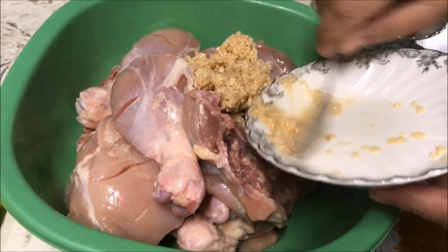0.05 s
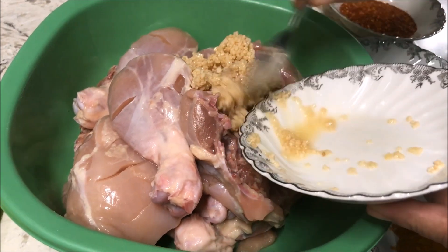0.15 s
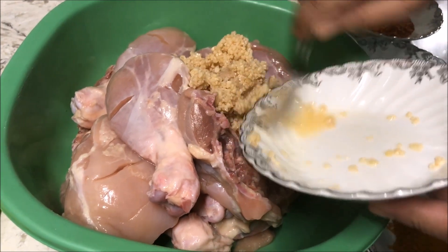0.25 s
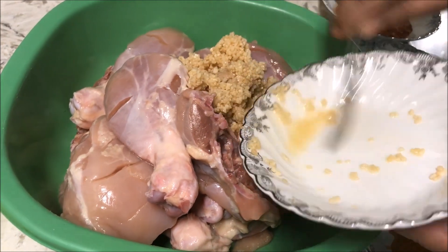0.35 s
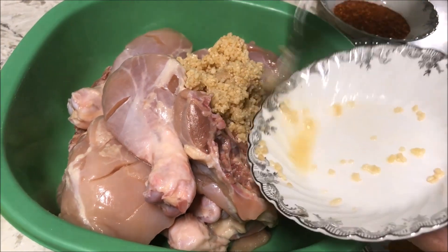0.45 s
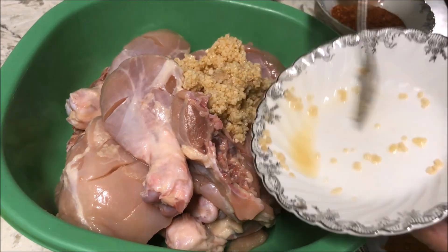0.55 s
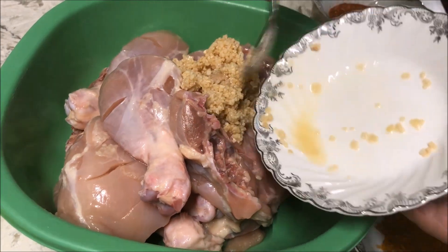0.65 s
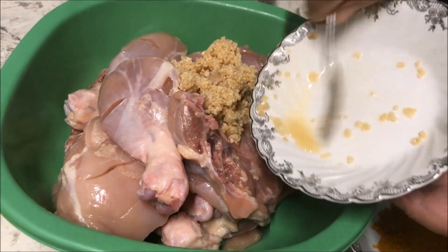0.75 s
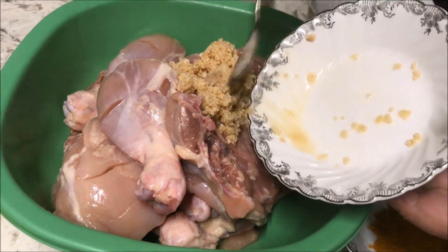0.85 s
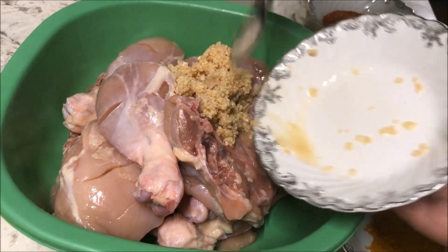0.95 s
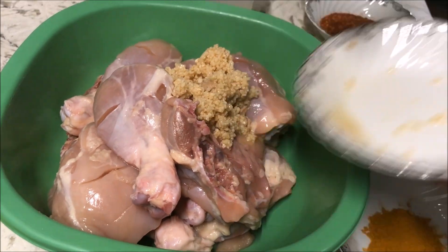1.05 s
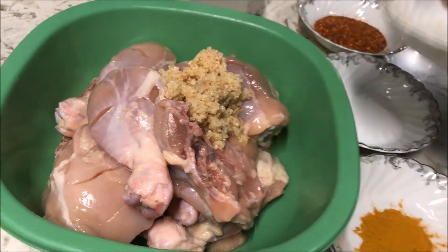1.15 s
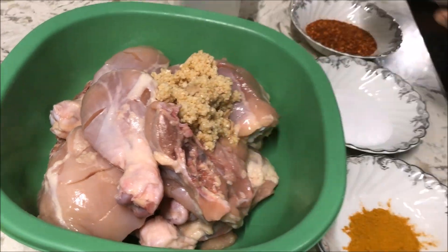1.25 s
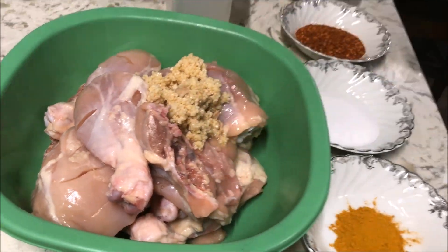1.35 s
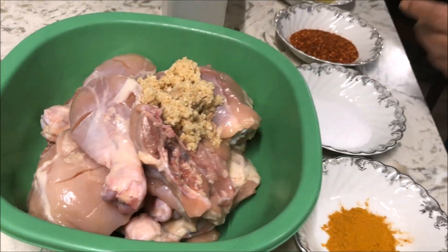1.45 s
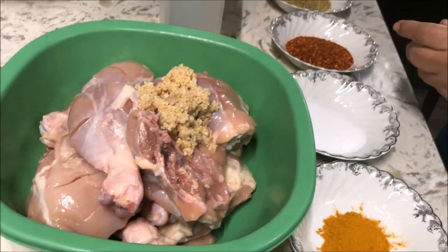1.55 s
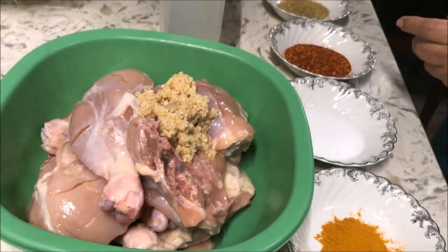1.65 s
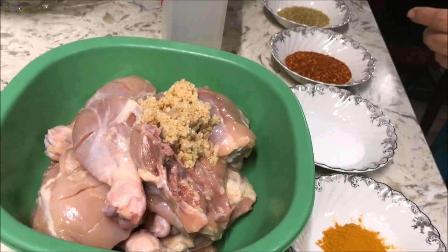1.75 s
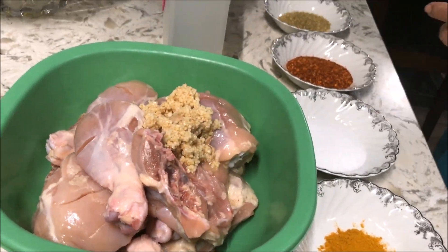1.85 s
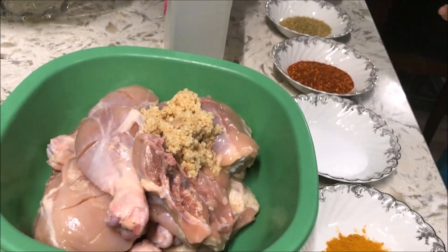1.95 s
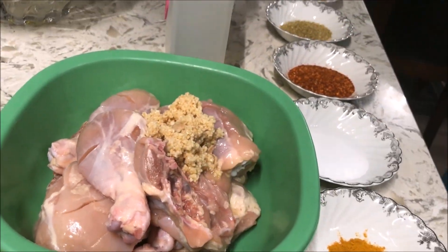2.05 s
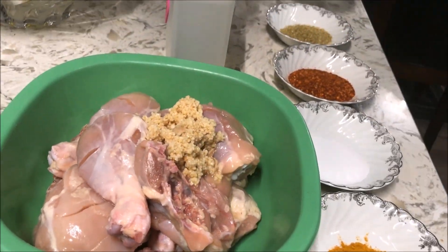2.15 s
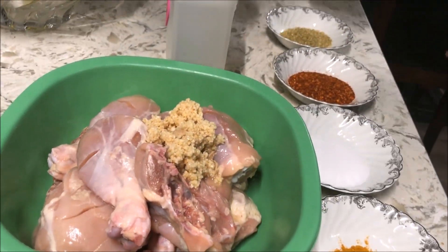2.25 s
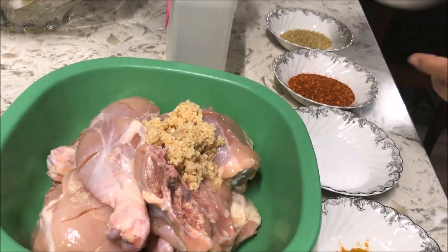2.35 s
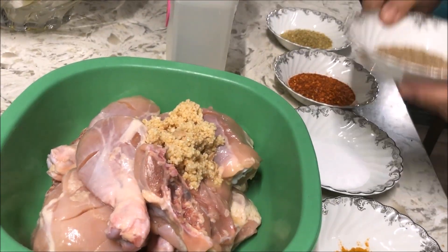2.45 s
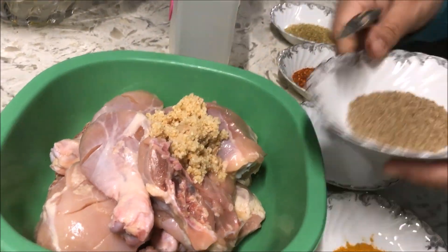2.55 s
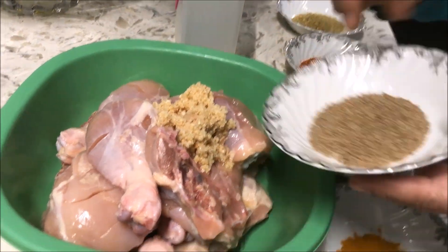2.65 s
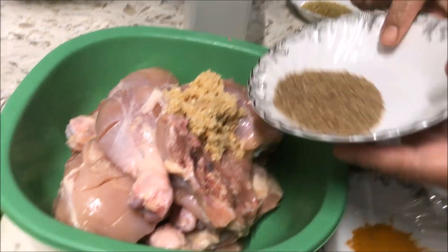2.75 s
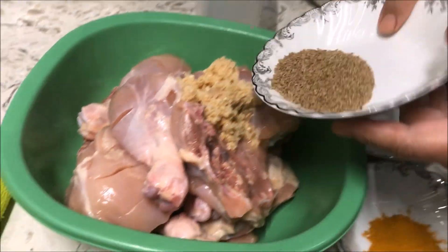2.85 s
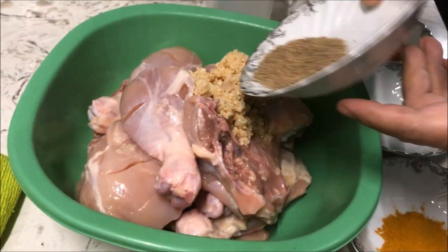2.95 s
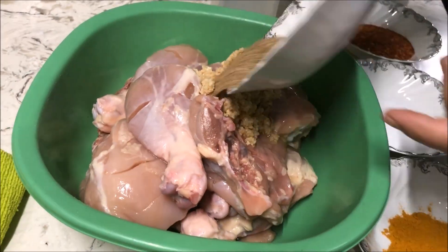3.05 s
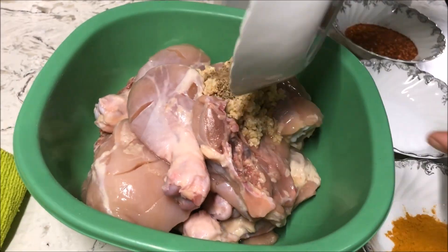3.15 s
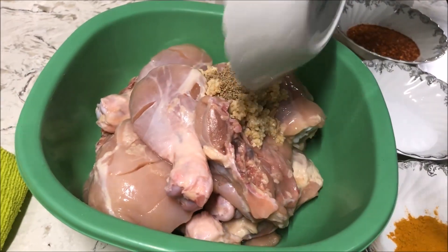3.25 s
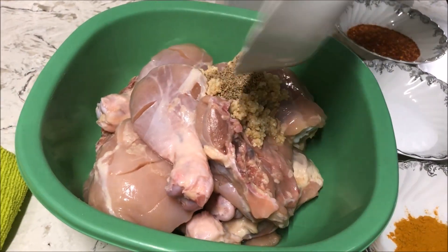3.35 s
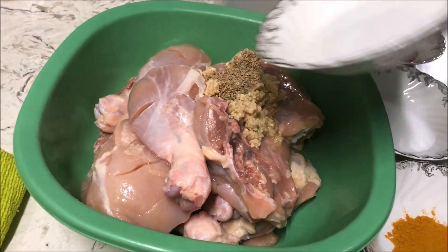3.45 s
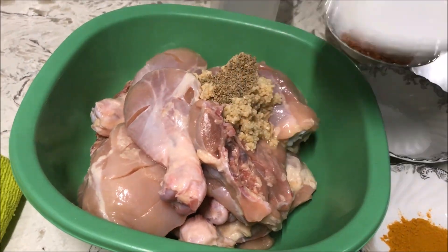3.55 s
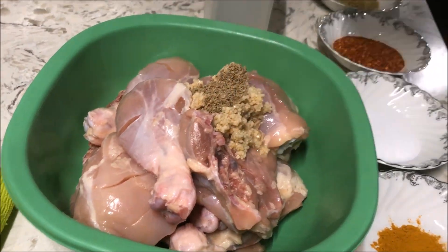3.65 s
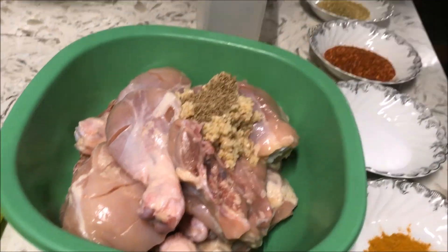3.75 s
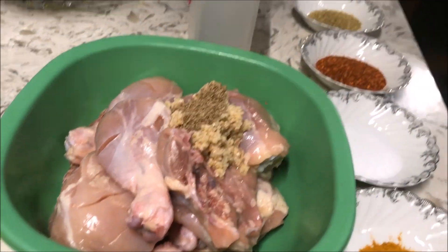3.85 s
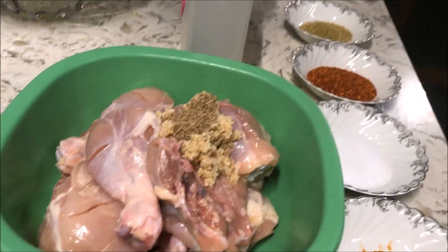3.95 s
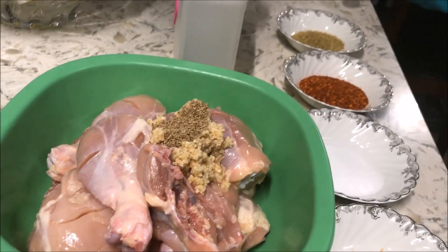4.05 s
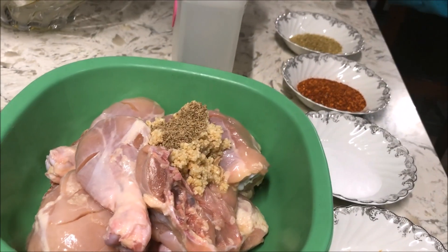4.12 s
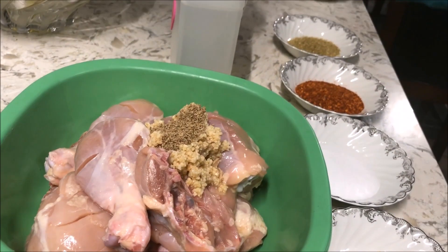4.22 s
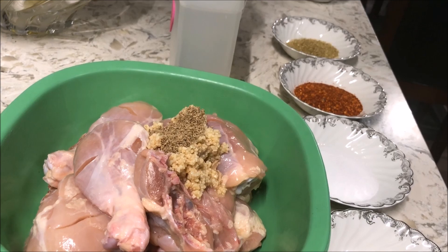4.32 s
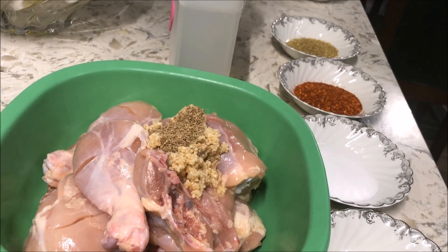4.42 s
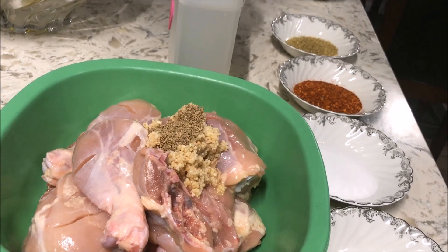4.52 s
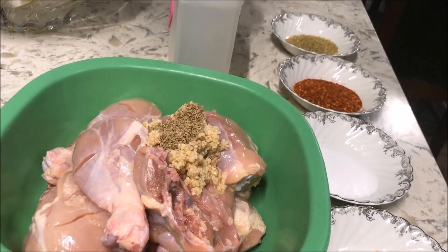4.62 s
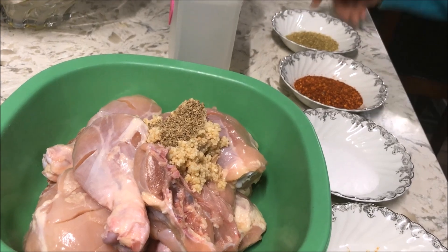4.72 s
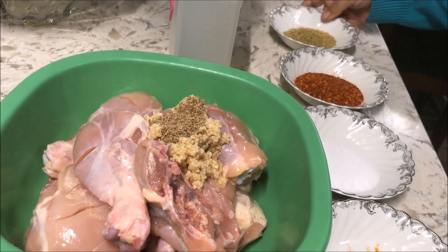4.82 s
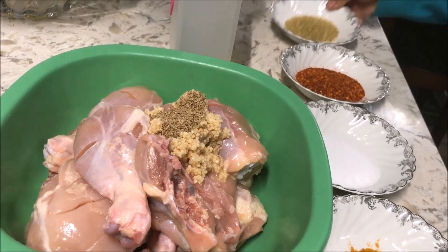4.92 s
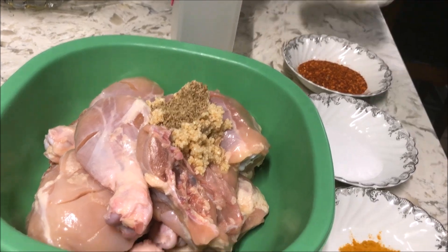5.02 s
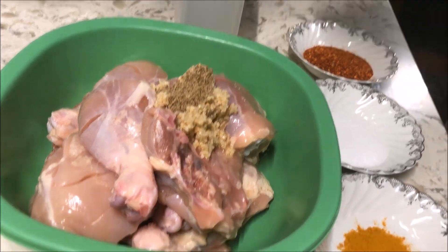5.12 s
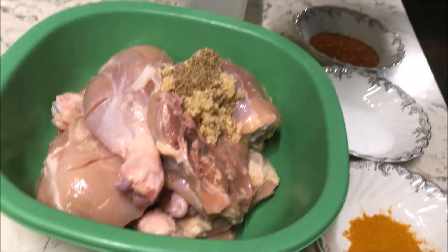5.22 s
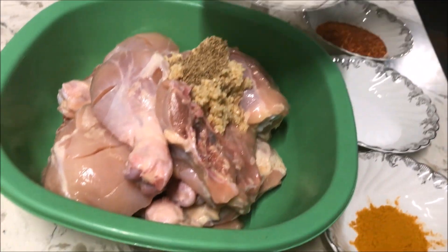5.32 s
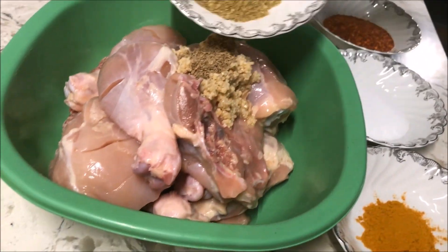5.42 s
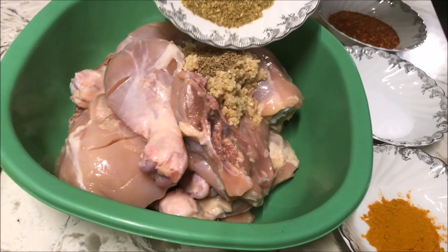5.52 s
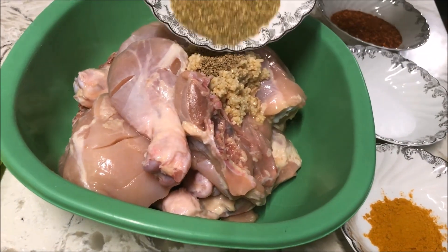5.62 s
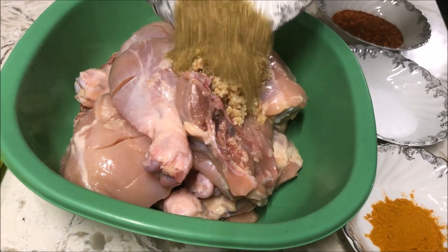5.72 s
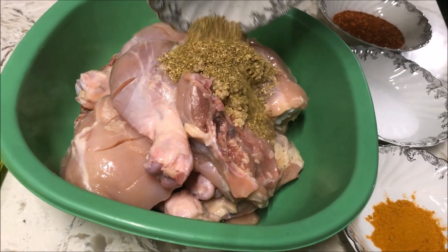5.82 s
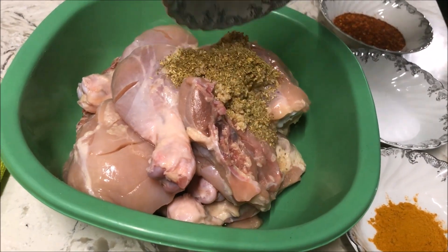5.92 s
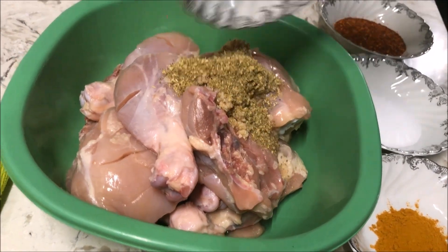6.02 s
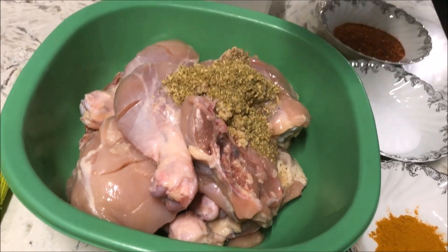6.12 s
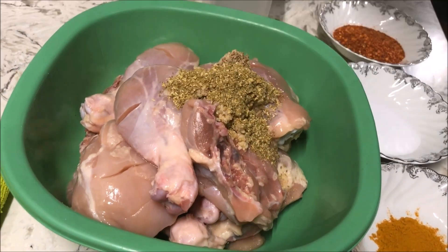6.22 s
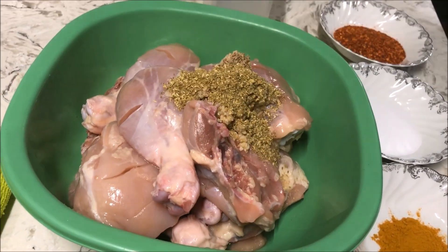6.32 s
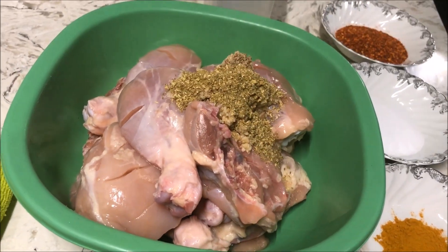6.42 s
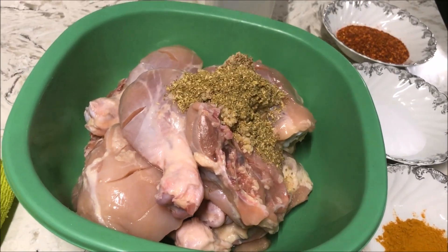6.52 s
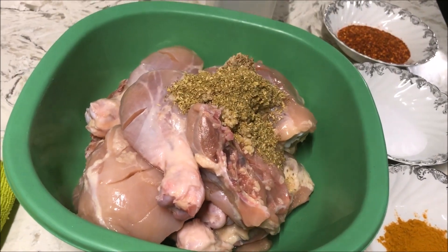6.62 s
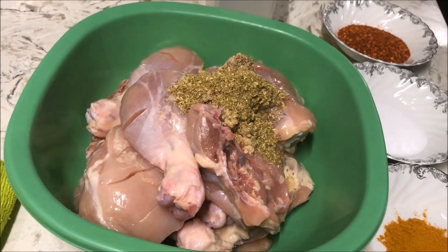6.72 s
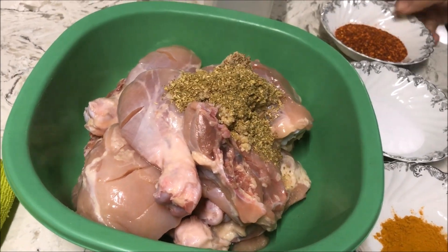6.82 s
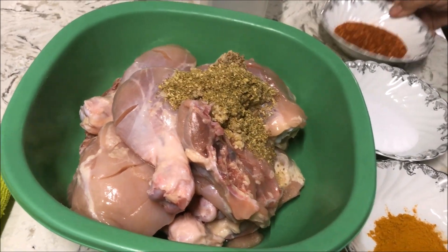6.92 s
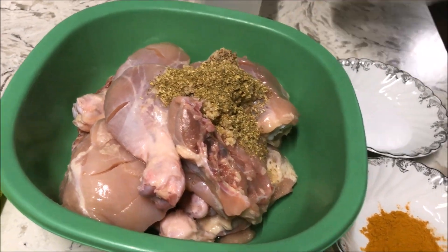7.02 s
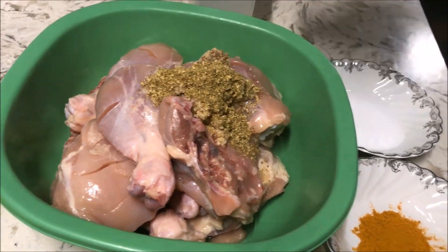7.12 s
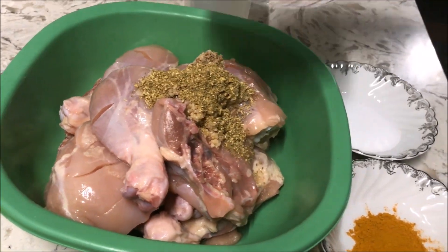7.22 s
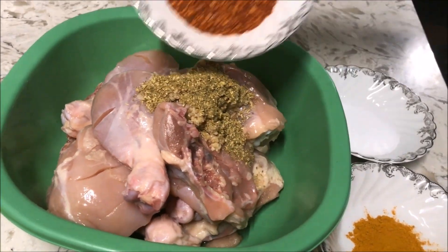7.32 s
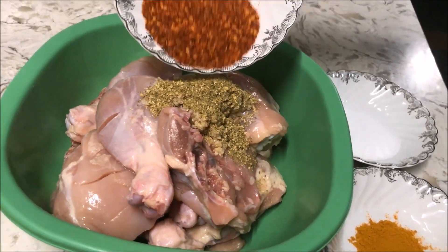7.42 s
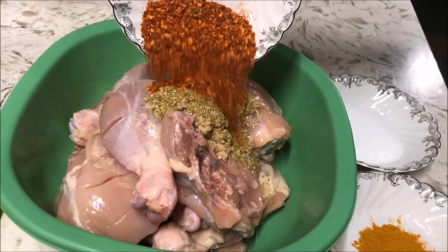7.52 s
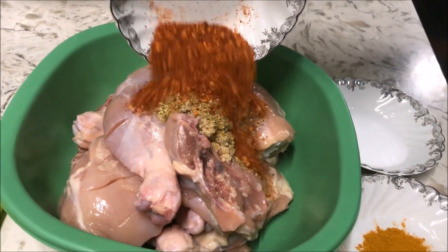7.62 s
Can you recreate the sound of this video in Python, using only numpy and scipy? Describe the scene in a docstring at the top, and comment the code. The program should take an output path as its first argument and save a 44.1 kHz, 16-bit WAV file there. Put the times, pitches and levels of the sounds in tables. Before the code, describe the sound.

Close to the microphone, a metal spoon scrapes a china dish in six fast, bright, ringing strokes within the first second. The spoon clatters onto a stone counter and the dish is set down. Farther off, spices hiss softly from small bowls, which clink together and knock down on the stone. A small kitchen with short echo, faint appliance hum and a distant low motor.

```python
"""A kitchen counter, with a china dish close to the microphone and a low appliance hum behind.
A steel spoon scrapes the dish in six quick strokes, as random clicks that ring modes and a gliding
squeak, and is put down with a clatter. Farther off, small bowls of spice are lifted, tipped out and
set down, clinking against their neighbours: noise bursts plus decaying modes. Grains hiss and patter.
A short room echo follows, and a distant motor drones past twice."""
import sys
import numpy as np
from scipy import signal
from scipy.fft import rfft, irfft
from scipy.io import wavfile

SR = 44100
rng = np.random.default_rng(int(sys.argv[2]) if len(sys.argv) > 2 else 0)


def master_out(mix):
    """Clip the mix to full scale and print it as 16-bit PCM to the path in sys.argv[1]."""
    frames = np.transpose(np.atleast_2d(mix))
    ceiling = np.clip(frames, -1, 1)
    pcm = np.round(ceiling * 32767).astype(np.int16)
    wavfile.write(sys.argv[1], SR, pcm)


N = 338247

# Spoon strokes from the floor of the dish up to its rim. Each row: landing in seconds, landing in dB,
# hardness (extra crack) in dB, leaving the rim in seconds, flick off the rim in dB, scrape in dB,
# squeak pitch in Hz at the start and at the end. Levels are relative.
STROKES = [(0.0641, -16, 1.5, 0.18, -14, -31.5, 2807, 5300),
           (.293, -12, -1.5, 0.36, -31, -29.5, 2700, 5200),
           (0.4503, -11, -3, 0.53, -14.5, -28.5, 3586, 3300),
           (0.6295, -13, 2.5, .7138, -15.5, -25.5, 2955, 4900),
           (0.8302, -11, -15, .9079, -13.5, -28, 3200, 5500),
           (1.002, -11, 6, 1.015, -15, -24.5, 3848, 4800)]
# Ringing of the dish's floor and rim, then of a spice bowl's floor and rim.
# Each row: pitch in Hz, relative level in dB, free decay by 60 dB in seconds.
DISH_FLOOR_MODES = [(7500, -2, 0.0052), (7900, 3, 0.031), (8050, -6, .035), (7550, -13, 0.027),
                    (12660, -3.5, 0.0091), (13174, -2, 0.023), (13050, -19, 0.085)]
DISH_RIM_MODES = [(2030, -15, .1), (4190, -20, .28), (4600, -13, .04), (6765, 0, .09), (9890, 1, .045),
                  (9910, -12, .19), (13540, -2, .06), (13720, -6, .04)]
BOWL_FLOOR_MODES = [(7980, 6, 0.037), (7580, -24.5, 0.29), (12900, 2.5, 0.063), (13100, -4.5, .07)]
BOWL_RIM_MODES = [(1890, -16, .2), (3960, -2, .19), (4750, -3, .045), (6480, -4, .18), (9600, -1, .1),
                  (9740, -3, .06), (13330, -1, .05)]
# Colours of contact noise: spoon knock, spoon thud on the counter, china knock, sharp treble crack,
# and the body and treble of a soft touch. Each row: frequency in Hz, relative level in dB per Hz.
SPOON_KNOCK = [(60, -29.5), (300, -25), (800, -16), (1400, -5.5), (2300, 6.5), (3500, -5), (5000, -4.5),
               (7000, -14.5), (16000, -26.5)]
SPOON_THUD = [(60, -40), (130, -32), (270, -11), (500, -9.5), (850, -7.5), (1250, -5.5), (1700, 4.5),
              (3000, -5), (4500, -5.5), (7000, -14), (16000, -40)]
CHINA_KNOCK = [(60, -36.5), (150, -16), (300, -6.5), (900, -8), (1300, 0.5), (2600, 5), (3400, 1.5),
               (4600, -0.5), (6000, -23.5), (9000, -24.5), (16000, -43.5)]
CRACK = [(500, -44), (3500, -12), (5500, -7), (7300, 4.5), (9000, -1), (11500, -3), (14000, -2),
         (16000, -10)]
TOUCH_BODY = [(60, -13), (200, 0.5), (400, -0.5), (600, -5), (1300, 0.5), (2200, 2.5), (3800, -0.5),
              (6000, -9.5), (16000, -21)]
TOUCH_TREBLE = [(500, -55), (3000, -19), (5500, -0.5), (10000, 5.5), (14000, -5.5), (16000, 2)]


def amp(db):
    """Decibels to gain."""
    return 10 ** (np.asarray(db) / 20)


def unit(x):
    """Scales to rms 1."""
    return x / np.sqrt(np.mean(x ** 2) + 1e-20)


def unit_attack(x):
    """Scales so that the first 6 ms have rms 1."""
    return x / np.sqrt(np.mean(x[:265] ** 2) + 1e-20)


def read(points, hz):
    """Reads a table on a log-frequency axis."""
    f, value = np.transpose(points)
    return np.interp(np.log(hz + 1), np.log(f), value)


def add(mix, s, sound):
    """Mixes a sound in at time s."""
    part = mix[round(s * SR):][:len(sound)]
    part += sound[:len(part)]


def drift(rate_hz, count=N):
    """Slow random wander, of rms 1 over the whole length."""
    hz = np.fft.rfftfreq(N, 1 / SR)
    return unit(irfft(rfft(rng.standard_normal(N)) * np.exp(-(hz / rate_hz) ** 2), N))[:count]


def colour(x, spectrum):
    """Causal (minimum-phase) filter with the given spectrum."""
    size = 2048
    log_gain = np.log(amp(read(spectrum, abs(np.fft.fftfreq(size, 1 / SR)))))
    impulse = np.fft.ifft(np.exp(np.conj(signal.hilbert(log_gain)))).real
    return signal.fftconvolve(x, impulse[:size // 2])[:len(x)]


def resonate(x, hz, width):
    """A resonance of gain 1 that follows the curve hz."""
    turn = np.exp(2j * np.pi * np.cumsum(hz) / SR)
    r = np.exp(-np.pi * width / SR)
    return 2 * (turn * signal.lfilter([1 - r], [1, -r], x / turn)).real


def ring(modes, shift_hz=0, tilt_db=0, spread=1):
    """Decaying modes, tilted per octave; balance and tuning vary a little at random with each contact."""
    hz, db, t60 = np.transpose(modes)[:, :, None]
    level, tuning, phase = rng.standard_normal((3, len(hz), 1))
    t = np.arange(SR // 3) / SR
    tuned_hz = (hz + shift_hz) * (1 + .0015 * spread * tuning)
    waves = np.sin(2 * np.pi * (tuned_hz * t + phase))
    rise = 1 - np.exp(-t / 0.00021)
    strength = db + tilt_db * np.log2(hz / hz[0]) + level
    return unit_attack(rise * (amp(strength - 60 * t / t60) * waves).sum(0))


def burst(spectrum, t60):
    """A contact shaking many dense, heavily damped modes: coloured, decaying noise."""
    t = np.arange(SR // 3) / SR
    return unit_attack(colour(rng.standard_normal(len(t)) * amp(-60 * t / t60), spectrum))


def slipping(count, per_s):
    """Random tiny clicks of uneven size."""
    return (rng.standard_normal(SR) * (rng.random(SR) < per_s / SR))[:count]


def room(x, wet_db, early_db):
    """First reflections from counter and walls, then a short diffuse tail."""
    # Decay of the kitchen's echo. Each row: frequency in Hz, decay by 60 dB in seconds.
    echo_t60 = [(200, 1), (700, 0.35), (1800, 0.32), (4500, 0.34), (9000, 0.3), (15000, 0.22)]
    t = np.arange(SR // 2) / SR
    scatter = rng.standard_normal(len(t)) * np.clip((t - .004) / 0.0027, 0, 1)
    hz, when, z = signal.stft(scatter, SR, nperseg=256)
    fade = amp(-60 * when / read(echo_t60, hz)[:, None])
    tail = signal.istft(z * fade, SR, nperseg=256)[1][:len(t)]
    early = np.zeros(len(t))
    early[(rng.uniform(.002, .016, size=12) * SR).astype(int)] = rng.choice([-1, 1], size=12)
    echo = amp(wet_db) * tail / np.linalg.norm(tail)
    echo += amp(early_db) * early / np.linalg.norm(early)
    return x + signal.fftconvolve(x, echo)[:N]


def kitchen_air(air_db=-66, waver=.25):
    """Soft hiss of filtered noise, and an appliance hum of tones with wavering phase."""
    # Colour of the room's hiss. Each row: frequency in Hz, relative level in dB per Hz.
    air_spectrum = [(25, -39), (60, -18), (120, -9.5), (230, -9.5), (400, -15), (800, -15.5), (1500, -24),
                    (3000, -27), (6000, -32), (15500, -34.5)]
    # Tones of the appliance. Each row: pitch in Hz, level in dB.
    hum_tones = [(210, -70.5), (240, -67.5), (315, -80), (420, -77.5)]
    t, hz = np.arange(N) / SR, np.fft.rfftfreq(N, 1 / SR)
    air = unit(irfft(rfft(rng.standard_normal(N)) * amp(read(air_spectrum, hz)), N))
    hum = sum(amp(db) * unit(np.sin(2 * np.pi * f * t + waver * drift(3.4))) for f, db in hum_tones)
    return amp(air_db) * air + hum


def distant_motor(flutter=.4):
    """A low, fluttering tone that swells and fades while its pitch glides."""
    # Passes of the motor. Each row: nearest point in seconds, level in dB, half-width in seconds,
    # pitch at the nearest point in Hz, glide in Hz per second.
    passes = [(.1, -69.5, .9, 139.3, 25), (5.9, -61.5, 0.79, 137, -2.5)]
    out = np.zeros(N)
    for s, db, width, hz, glide in passes:
        t = np.arange(N) / SR - s
        turn = 2 * np.pi * (hz + glide * t / 2) * t
        tone = unit((1 + flutter * drift(13)) * np.sin(turn) + flutter * drift(7) * np.cos(turn))
        out += amp(db) * tone / (1 + (t / width) ** 2)
    return out


def taps():
    """Dull touches that do not ring: short noise bursts, heard mostly through the room."""
    # Soft handling. Each row: start in seconds, body in relative dB, treble in relative dB.
    touches = [(2.456, -75, -89.5), (2.919, -69, -54), (3.28, -60, -53), (3.495, -65.5, -60.5),
               (3.687, -57.5, -47.5), (3.785, -56.5, -64.5), (4.01, -53, -49), (4.857, -69, -78),
               (5.866, -62, -59.5), (6.081, -56, -59), (6.261, -57.5, -60), (6.309, -42, -46.5),
               (6.976, -46, -37.5), (7.225, -62, -50.5), (7.521, -56, -48.5)]
    out = np.zeros(N)
    for s, body_db, treble_db in touches:
        add(out, s, amp(body_db + 1) * burst(TOUCH_BODY, 0.1))
        add(out, s, amp(treble_db - 4) * burst(TOUCH_TREBLE, 0.039))
    return out


def bumps(soft_s=0.0049):
    """Soft contacts reach only a few low, damped modes."""
    # Spice landing and hands on the counter. Each row: start in seconds, level in dB before softening.
    soft_landings = [(1.855, -45.5), (5.009, -49), (5.789, -54.5), (5.87, -58.5), (6.11, -58), (6.266, -46),
                     (6.299, -60), (6.819, -54)]
    # Low modes they excite. Each row: pitch in Hz, relative level in dB, decay by 60 dB in seconds.
    low_modes = [(303, -4, 0.45), (405, 3, 0.11), (536, -15, 0.33), (710, -1.5, 0.093)]
    out, t = np.zeros(N), np.arange(SR // 3) / SR
    for s, db in soft_landings:
        add(out, s, amp(db) * ring(low_modes, spread=24) * (1 - np.exp(-t / soft_s)))
    return out


def pouring(grains_per_s=1200, china_db=-3, clumps_per_s=90, patchy_db=3):
    """Grains slide over the glaze with a patchy hiss and faintly ring the bowl; clumps patter onto the food."""
    # Surges of spice out of a tilted bowl. Each row: peak in seconds, half-width in seconds,
    # hiss in relative dB, patter in dB.
    surges = [(2.74, .1, -64.5, -73), (3.12, .14, -72.5, -91.5), (5.62, 0.18, -85, -67.5),
              (5.87, 0.05, -79.5, -74), (7.49, 0.11, -67, -73.5)]
    t = np.arange(N) / SR
    grains = rng.standard_normal(N) * (rng.random(N) < grains_per_s / SR)
    clumps = rng.standard_normal(N) * (rng.random(N) < clumps_per_s / SR)
    finger_damping = np.exp(-np.arange(SR // 3) / SR / 0.017)
    held_rim = 0.5 * ring(BOWL_RIM_MODES) * finger_damping
    china = signal.fftconvolve(grains, ring(BOWL_FLOOR_MODES) + held_rim)[:N]
    hiss = amp(-7) * unit(colour(grains, TOUCH_TREBLE)) + amp(china_db) * unit(china)
    hiss *= amp(patchy_db * drift(27))
    patter = unit(colour(clumps, TOUCH_BODY))
    out = np.zeros(N)
    for s, width, hiss_db, patter_db in surges:
        surge = np.exp2(-((t - s) / width) ** 2)
        out += surge * (amp(hiss_db) * hiss + amp(patter_db) * patter)
    return out


def dragging(slips_per_s=1500, treble_db=-9):
    """A short, gritty slide over stone: random slips coloured as thud and crack."""
    # China or steel dragged over the counter. Each row: start and end in seconds,
    # relative level in dB at the start and at the end.
    slides = [(1.73, 1.762, -49, -56), (1.789, 1.848, -46, -38.5), (4.886, 4.932, -59, -42)]
    out = np.zeros(N)
    for start, end, db0, db1 in slides:
        count = max(int((end - start) * SR), SR // 100)
        slips = slipping(count, slips_per_s)
        sound = unit(colour(slips, SPOON_THUD)) + amp(treble_db) * unit(colour(slips, CRACK))
        level = amp(np.linspace(db0, db1, count) - 2.5)
        add(out, start, sound * level * signal.windows.tukey(count, .2))
    return out


def rim_ring(hardness_db, shift_hz=0):
    """The rim of a small bowl; a softer contact favours its low modes."""
    tilt_db = .25 * np.clip(hardness_db + 6, -20, 20)
    return ring(BOWL_RIM_MODES, shift_hz, tilt_db)


def bowl_on_bowl(floor_db=5, rim_db=-6, ring_per_db=0.5633, held_t60=0.55):
    """A bowl being picked up nudges the bowls beside it; harder contacts ring more."""
    # Bowls touching. Each row: start in seconds, knock in relative dB, hardness in dB,
    # place from floor 0 to rim 1.
    nudges = [(2.681, -64.5, -12.5, .95), (4.5402, -36.5, 12, 0.059), (4.5607, -41.5, 8, 0.7),
              (4.6332, -38, 11.5, 0.77), (4.6518, -38.5, 14.5, 1), (4.684, -43.5, 13.5, 1),
              (4.927, -33, -13, .98), (4.9615, -29, 5.5, 0.89), (5.0091, -33, 17, 1), (5.0132, -31.5, 4, 1),
              (5.0372, -34.5, -32, 0.79)]
    out = np.zeros(N)
    for s, db, hardness_db, place in nudges:
        contact = amp(-0.5) * burst(CHINA_KNOCK, 0.046) + amp(hardness_db - 11.5) * burst(CRACK, 0.017)
        china = (1 - place) * amp(floor_db) * ring(BOWL_FLOOR_MODES)
        china += place * amp(rim_db) * rim_ring(hardness_db)
        china *= amp(-60 * np.arange(len(china)) / SR / held_t60)  # the hand shortens the ring
        add(out, s, amp(db) * (contact + amp(ring_per_db * hardness_db) * china))
    return out


def foot_knock(hardness_db, hollow_db, hollow_per_db=0.3):
    """China on stone: the harder the contact, the more it cracks and rings the bowl's foot and floor."""
    # Hollow note of the foot. Each row: pitch in Hz, relative level in dB, decay by 60 dB in seconds.
    foot_modes = [(1134, -5.5, 0.039), (1293, -2.5, 0.024), (1528, 2, 0.0346)]
    # Crack of china on stone. Each row: frequency in Hz, relative level in dB per Hz.
    stone_crack = [(500, -35), (3500, -20), (5500, 8), (7300, 4.5), (9500, -11), (11500, -29), (14000, -25),
                   (16000, -20.5)]
    hollow = colour(ring(foot_modes, spread=8.2), [(100, -24.5), (900, -0.5)])  # thins the lows
    knock = amp(-1) * burst(CHINA_KNOCK, 0.023)
    knock += amp(hollow_db + hollow_per_db * hardness_db) * hollow
    sharp = amp(-7) * burst(stone_crack, 0.015) + amp(-8) * ring(BOWL_FLOOR_MODES)
    return knock + amp(hardness_db) * sharp


def set_down(rock_hardness_db=-19):
    """A bowl's foot knocks on stone, then rocks onto its other edge."""
    # China set down. Each row: start in seconds, knock in relative dB, hardness in dB, rim ring in dB,
    # delay of the second edge in seconds, its knock in relative dB, bowl size.
    landings = [(2.0409, -50.5, -13, -69, 0.0036, -59, "small"),
                (2.1406, -23.5, -7.5, -41.5, .0095, -33.5, "small"),
                (4.0875, -20, -4, -57, 0.014, -24.5, "large"),
                (4.2322, -34.5, -20, -65, 0.0094, -40, "large"),
                (5.0105, -34, 11, -35.5, .005, -35.5, "large"),
                (6.5793, -21, 2.5, -40.5, .0153, -22, "large"),
                (6.6666, -26, -44, -41.5, .007, -31, "large"),
                (6.91, -36.5, -36, -43.5, .0067, -32.5, "small"),
                (6.9783, -39.5, -1.5, -62, 0.0054, -63, "small")]
    # For each bowl size: rise of the rim modes in Hz, hollow note of the foot in relative dB.
    sizes = {"large": (0, -9.5), "small": (320, -4)}
    out = np.zeros(N)
    for s, db, hardness_db, rim_db, rock_s, rock_db, size in landings:
        shift_hz, hollow_db = sizes[size]
        add(out, s, amp(db) * foot_knock(hardness_db, hollow_db))
        add(out, s, amp(rim_db) * rim_ring(hardness_db, shift_hz))
        add(out, s + rock_s, amp(rock_db) * foot_knock(rock_hardness_db, hollow_db))
    return out


def spoon_dropped(handle_lag_s=.005, handle_db=-4):
    """The spoon bounces, its bowl landing just before its handle, buzzing at each contact."""
    # Bounces on the counter. Each row: start in seconds, strength in relative dB, hardness in dB,
    # ring in dB relative to the strength.
    bounces = [(1.7171, -23, -4, 0), (1.7602, -22, -16, -6.5), (1.776, -25, -3, -5.5),
               (1.8474, -26.5, -11, -10.5), (1.859, -31.5, -2.5, -22)]
    # Ringing of the steel. Each row: pitch in Hz, relative level in dB, decay by 60 dB in seconds.
    steel_modes = [(506, -25, .14), (694, -3.5, 0.092), (1009, -1, 0.064), (1820, 3, 0.044),
                   (2550, 8, 0.099), (3960, 5, 0.062), (9860, 1, 0.23), (10200, 1, 0.079),
                   (13550, -13, .07)]
    out = np.zeros(N)
    for s, db, hardness_db, ring_db in bounces:
        contact = amp(-8.5) * burst(SPOON_THUD, 0.048) + amp(hardness_db - 2.5) * burst(CRACK, 0.098)
        handle = amp(-5.5) * burst(SPOON_THUD, 0.078) + amp(ring_db + 0.5) * ring(steel_modes)
        add(out, s, amp(db) * (contact + amp(ring_db - 3) * ring(DISH_FLOOR_MODES)))
        add(out, s + handle_lag_s, amp(db + handle_db) * handle)
    return out


def singing(from_s=.5, peak_db=-27.5, swell_s=0.011, t60=0.091):
    """Freed from the spoon, the tipped-up dish's lowest mode swells and fades."""
    out, t = np.zeros(N), np.arange(SR // 3) / SR
    shape = (1 - np.exp(-t / swell_s)) * amp(-60 * t / t60)
    tone = np.sin(2 * np.pi * DISH_RIM_MODES[0][0] * t)
    for _, _, _, leaves, *_ in STROKES:
        if leaves > from_s:
            add(out, leaves, amp(peak_db) * shape / shape.max() * tone)
    return out


def scraping(slips_per_s=2500, squeak_db=-4, grit_db=-10, china_db=-2, squeak_width_hz=600,
             flutes_per_s=120, stumble=.05, patchy_db=4, delay_s=.012, swell_db=1.5):
    """Steel sticks and slips on the glaze: tiny clicks ring the dish and a rough, gliding squeak."""
    out, unsteady = np.zeros(N), drift(90)
    for lands, _, _, leaves, _, db, hz0, hz1 in STROKES:
        start = lands + delay_s
        count = max(int((leaves - start) * SR), SR // 50)
        t, climb = np.arange(count) / SR, np.linspace(0, 1, count)
        flute_hz = flutes_per_s * rng.uniform(.9, 1.1)
        flutes = 1 + 0.33 * np.sin(2 * np.pi * (flute_hz * t + rng.random()))
        slips = slipping(count, slips_per_s) * flutes

        china = signal.fftconvolve(slips, ring(DISH_FLOOR_MODES))[:count]
        # the rim joins in as the spoon nears it
        china += 0.23 * climb * signal.fftconvolve(slips, ring(DISH_RIM_MODES))[:count]

        # flutes and an unsteady hand bend the squeak
        bend = 0.17 * (flutes - 1) + stumble * unsteady[round(start * SR):][:count]
        hz = (hz0 + (hz1 - hz0) * climb) * (1 + bend)
        squeak = resonate(resonate(slips, hz, squeak_width_hz), hz, squeak_width_hz)
        squeak += 0.8 * resonate(resonate(slips, 2 * hz, squeak_width_hz), 2 * hz, squeak_width_hz)
        squeak *= (0.47 + climb) * amp(patchy_db * drift(70, count))

        grit = (0.18 + climb) * unit(colour(slips, CRACK)) + 0.43 * unit(colour(slips, SPOON_KNOCK))
        sound = amp(china_db) * unit(china) + amp(squeak_db) * unit(squeak) + amp(grit_db) * grit
        pressure = amp(db + swell_db * (climb - .5))  # presses harder towards the rim
        add(out, start, sound * pressure * signal.windows.tukey(count, .15))
    return out


def damping(s, pressed_t60=.07):
    """A ring started at time s is choked for as long as the spoon presses on the dish."""
    t = s + np.arange(SR // 3) / SR
    pressed = sum((t > lands) & (t < leaves) for lands, _, _, leaves, *_ in STROKES)
    return amp(-60 * np.cumsum(pressed) / SR / pressed_t60)


def dish_blow(s, db, place, hardness_db=0):
    """The nearer the rim, the sharper the crack and the more the rim rings instead of the floor."""
    # knock, crack, floor ring and rim ring in dB, for a blow of 0 dB
    at_floor = np.array([-15, -12.5, 0, -22.5])
    at_rim = np.array([-16, -5, -7.5, 1])
    knock, crack, floor, rim = db + at_floor + place * (at_rim - at_floor)
    contact = amp(knock) * burst(SPOON_KNOCK, 0.027) + amp(crack + hardness_db) * burst(CRACK, 0.029)
    china = amp(floor) * ring(DISH_FLOOR_MODES, spread=6.1)
    china += amp(rim) * ring(DISH_RIM_MODES, tilt_db=3.1, spread=0.48) * damping(s)
    return s, contact + china


def spoon_on_dish(graze_s=0.013, graze_db=-33, skip_s=0.0081, skip_db=-6):
    """The spoon grazes and lands on the dish's floor, skips, catches on the fluted wall, flicks off the rim."""
    # Catches on the wall; the first row only sets the dish faintly ringing as the sound begins. Each row: start
    # in seconds, strength in relative dB, place from floor 0 to rim 1.
    wall_catches = [(.0005, -39, .7), (.1252, -15.5, .4), (.138, -12, .1), (.1597, -13, .8), (.33, -25, .3),
                    (.4946, -28, .6), (.5143, -12, .85), (.6698, -10.5, .5), (.6775, -8, .55),
                    (.6901, -19.5, .75), (.7016, -13.5, .8), (.8596, -15.5, .15), (1.2492, -42.5, 0.19)]
    out = np.zeros(N)
    for lands, db, hardness_db, leaves, flick_db, *_ in STROKES:
        add(out, *dish_blow(lands - graze_s, db + graze_db, .2))
        add(out, *dish_blow(lands, db, 0, hardness_db))
        add(out, *dish_blow(lands + skip_s, db + skip_db, 0.091, hardness_db))
        add(out, *dish_blow(leaves, flick_db, 0.88))
    for s, db, place in wall_catches:
        add(out, *dish_blow(s, db, place))
    return out


def scene():
    """The dish is close to the microphone; the counter lies farther off and sounds wetter."""
    background = kitchen_air() + distant_motor()
    far = room(taps(), wet_db=-0.5, early_db=1)
    on_counter = bumps() + pouring() + dragging() + bowl_on_bowl() + set_down() + spoon_dropped()
    counter = room(on_counter, wet_db=-10.5, early_db=-9.5)
    near = room(singing() + scraping() + spoon_on_dish(), wet_db=-17, early_db=-22.5)
    return (background + far + counter + near)[None]


def record(dry):
    """Peaks beyond full scale clip; then a lowpass limits the band."""
    lowpass = signal.firwin(255, 16100, window=("kaiser", 8), fs=SR)  # edge in Hz
    return signal.oaconvolve(np.clip(dry, -1, 1), lowpass[None], "same")


dry = scene()
out = record(dry)
master_out(out)
```